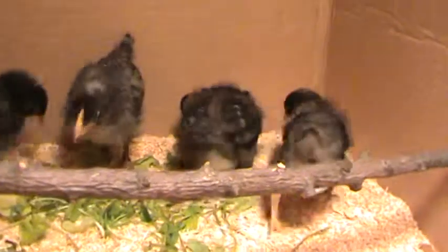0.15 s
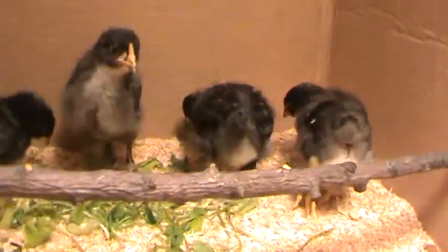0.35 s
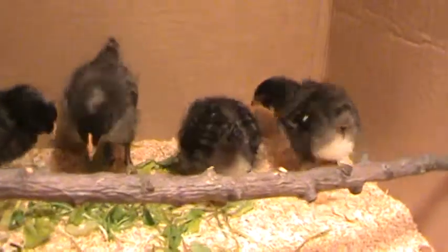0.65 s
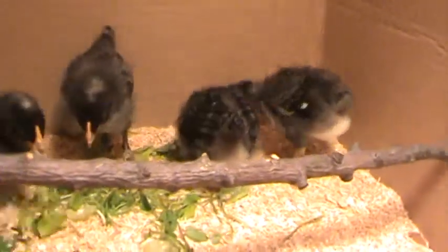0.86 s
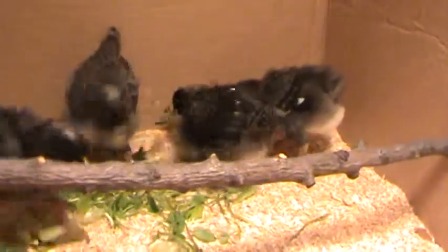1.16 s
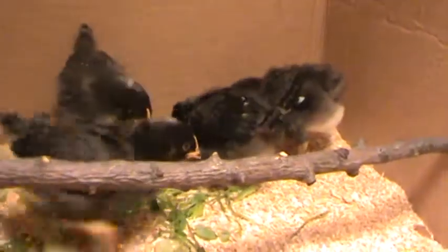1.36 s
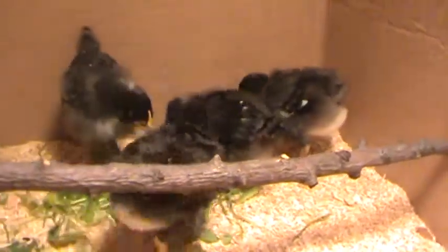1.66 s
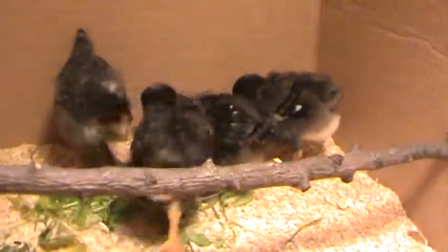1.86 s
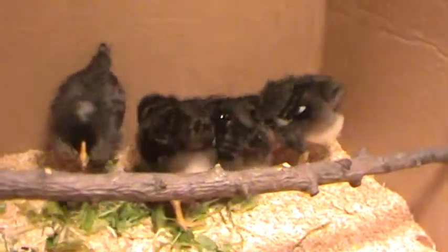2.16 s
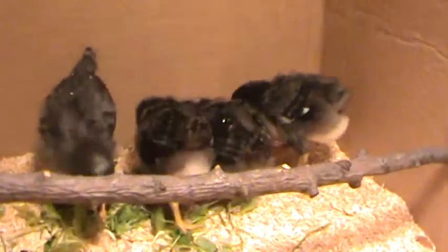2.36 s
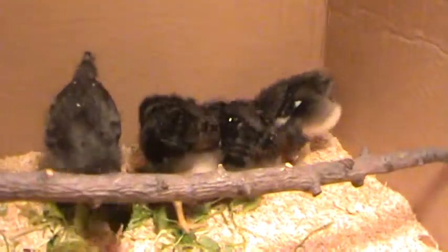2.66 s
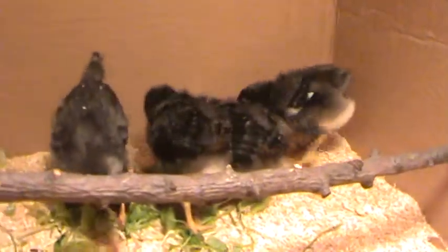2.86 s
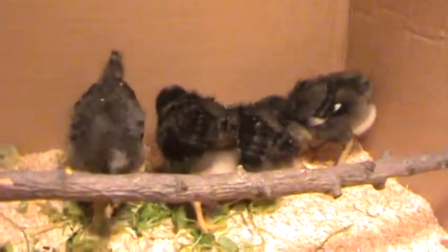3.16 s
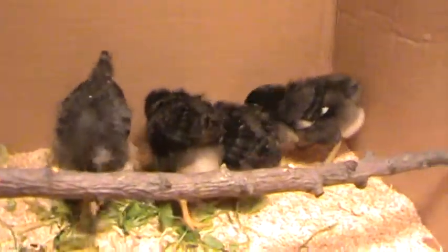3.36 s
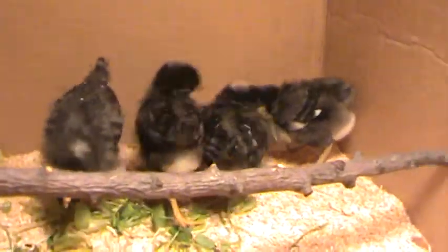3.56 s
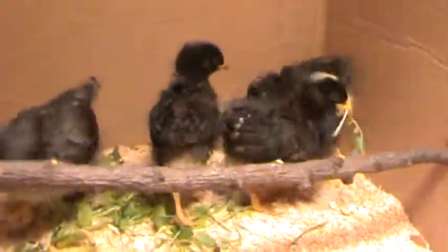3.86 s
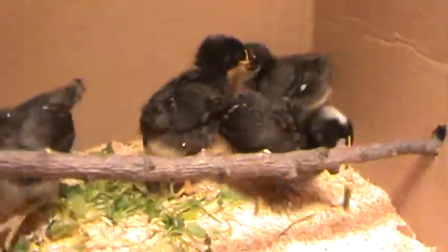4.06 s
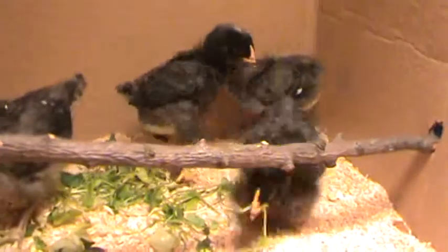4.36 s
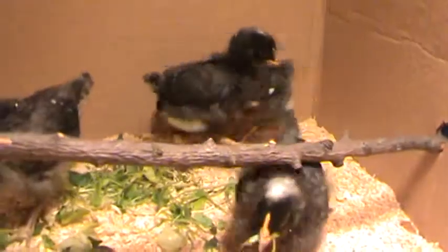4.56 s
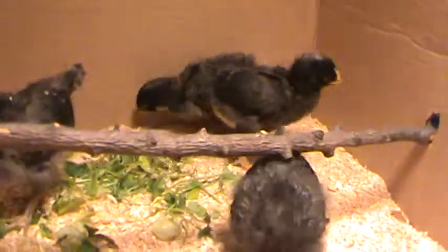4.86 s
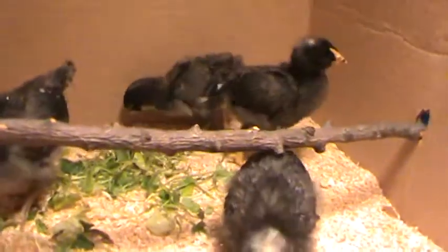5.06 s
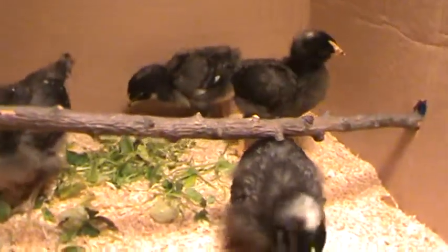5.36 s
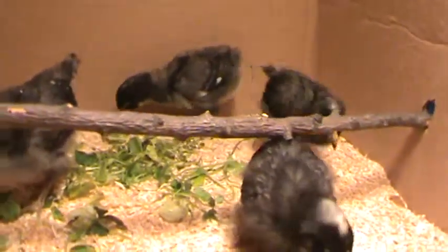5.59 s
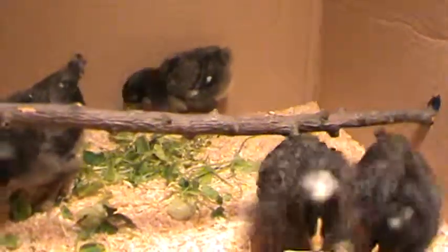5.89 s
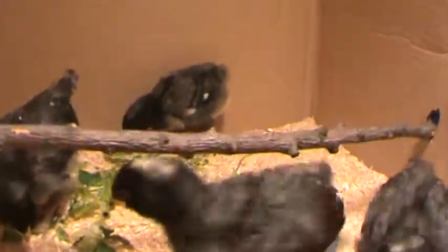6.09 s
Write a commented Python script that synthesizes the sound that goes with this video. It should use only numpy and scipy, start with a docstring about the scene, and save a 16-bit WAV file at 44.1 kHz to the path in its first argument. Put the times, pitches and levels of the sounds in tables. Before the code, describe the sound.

Close stereo sound inside a cardboard brooder box, with very short reflections, faint hiss and a low room rumble. Dry shavings rustle softly from the start; a sharp tick and dull knock come near 0.15 s. From 0.4 to 0.85 s several chicks peep rapidly, thin high crests dropping into louder falling whistles, mixed with lower arched notes. Ticks and light knocks follow at 1.0-1.3 s, then a small group of peeps around 1.4-1.55 s. Clacks at 2.1, 2.7 and 3.2 s surround sparser calls at 2.25-2.45 and 3.15 s. Peeps grow stronger from 3.4 to 4.2 s while treading rumbles the floor from 3.75 s. More calls and a soft chirrup come at 4.6-4.9 s, with a knock and more steps until about 5.45 s, when another chirrup sounds. Loud peeps, crisp raking scratches and swelling rustle finish from 5.7 to 6.2 s.

```python
"""Young chicks in a cardboard brooder box in a quiet, low-rumbling room, heard through two close microphone ports.
Shavings rustle from the start, a sharp snap and a knock lead in, and a first run of peeps follows within a second:
each holds a thin high crest, then breaks into a loud falling whistle, often beside an arched one, mostly low.
Peeps thin out while clacking knocks ring the damped floor, then return louder, with two soft bowl-shaped chirrups.
Treads rumble the floor in the second half; raking feet set shavings ringing, and the rustle swells at the end."""
import sys
import numpy as np
from scipy import signal
from scipy.fft import rfft, irfft, next_fast_len
from scipy.io import wavfile
from scipy.ndimage import uniform_filter1d

SR = 44100
rng = np.random.default_rng(int(sys.argv[2]) if len(sys.argv) > 2 else 0)


def inscribe(sig):
    """Save sig as 16-bit PCM at rate SR to the path in sys.argv[1].

    A 1-D sig is mono; a 2-D sig holds one channel per row.
    Samples are clipped to [-1, 1] before scaling.
    """
    pcm = np.round(np.clip(np.atleast_2d(sig).T, -1, 1) * 32767)
    wavfile.write(sys.argv[1], SR, pcm.astype(np.int16))


N = 274743
TIME = np.arange(N) / SR

# modes of the box floor: (frequency [Hz], relative level [dB])
BOX_MODES = [(172, -5.5), (238, -1), (385, -5.5), (520, 1), (825, 3.5), (1400, -11.5), (1800, -2)]
# spectrum of sharp snaps and ringing shavings: (frequency [Hz], relative level [dB])
SNAP_COLOUR = [(80, -17), (500, -9.5), (2000, -13.5), (5500, -11), (7600, -3), (9000, -3.5), (12500, -18)]
# spectrum of feathers and feet brushing: (frequency [Hz], relative level [dB])
BRUSH_COLOUR = [(30, -6), (130, -1.5), (350, -4), (750, 0), (2200, -4.5), (6300, -9.5), (8600, -4),
                (12000, -20.5)]
SHAVING_LOW_HZ, SHAVING_HIGH_HZ = 3700, 10530   # long and short shavings
SHAVING_CYCLES = 4.2   # cycles until a shaving has died by 60 dB


def from_db(db):
    """Decibels to gain."""
    return 10 ** (np.asarray(db) / 20)


def rms_one(x):
    """Scale to unit rms."""
    return x / np.sqrt(np.mean(x ** 2) + 1e-20)


def at_hz(points, hz):
    """Read a table on a log-frequency axis."""
    known_hz, values = np.transpose(points)
    return np.interp(np.log(np.maximum(hz, 1)), np.log(known_hz), values)


def colour(x, spectrum):
    """Causal (minimum-phase) filter with the given spectrum, made by folding the cepstrum."""
    size = 2 * next_fast_len(x.shape[-1])
    gain = from_db(at_hz(spectrum, np.fft.rfftfreq(size, 1 / SR)))
    cepstrum = irfft(np.log(gain))
    cepstrum[1:size // 2] *= 2
    cepstrum[size // 2 + 1:] = 0
    response = np.exp(rfft(cepstrum))
    return irfft(rfft(x, size) * response)[..., :x.shape[-1]]


def add(track, s, sound):
    """Mix a stereo sound in at time s."""
    start = max(round(s * SR), 0)
    track[:, start:start + sound.shape[1]] += sound[:, :max(N - start, 0)]


def drift(size, per_s):
    """Random values of spread 1, per_s of them each second, joined by straight lines."""
    knots = rng.standard_normal(1024)
    return np.interp(np.arange(size) / SR * per_s, np.arange(len(knots)), knots)


def ring(x, hz, t60):
    """One resonant mode that dies by 60 dB in t60 seconds."""
    radius = from_db(-60 / (t60 * SR))
    angle = 2 * np.pi * hz / SR
    return signal.lfilter([1, 0, -1], [1, -2 * radius * np.cos(angle), radius * radius], x + 1e-18)


def chicks():
    """Each whistled note comes from its own spot in the box."""
    # peeps: (time [s], crest length [s], fall length [s], upswing depth [Hz], crest pitch [Hz],
    #   pitch at start of fall [Hz], end pitch [Hz], crest level [dB], fall level [dB], relative overtone level [dB])
    peeps = [ (0.416, 0.027, 0.02, 4, 4640, 3750, 2500, -51, -29, 9.5),
             (0.462, 0.063, 0.034, 4, 5750, 4760, 2570, -42.5, -19.5, -3.5),
             (0.622, 0.067, 0.031, 1909, 5660, 4730, 2580, -42, -20.5, -0.5),
             (0.779, 0.064, 0.032, 2670, 5640, 4800, 2490, -42, -16.5, -5),
             (1.473, 0.067, 0.024, 2201, 5390, 4600, 2660, -36.5, -24.5, 1),
             (2.251, 0.032, 0.03, 207, 4980, 3670, 2630, -48, -29.5, 5),
             (2.304, 0.056, 0.021, 1357, 5430, 4430, 2760, -40.5, -21.5, -3.5),
             (2.434, 0.062, 0.032, 1490, 5580, 4480, 2590, -38, -22.5, -2.5),
             (3.143, 0.061, 0.05, 799, 5620, 4560, 2590, -37, -23, 2),
             (3.405, 0.04, 0.034, -4, 4960, 3900, 2540, -45, -31, 2.5),
             (3.578, 0.042, 0.028, 0, 5070, 3550, 2580, -36, -17, -3.5),
             (3.979, .036, .089, 7, 5480, 4100, 2786, -37.5, -13, -10),
             (4.042, 0.079, 0.027, 492, 5450, 4600, 2560, -40, -26.5, -8),
             (4.165, 0.039, 0.067, 0, 5275, 4600, 2620, -25.5, -15, -8.5),
             (4.701, 0.054, 0.05, 497, 5160, 4250, 2766, -28, -12, -2),
             (5.786, 0.052, 0.03, 395, 5100, 3930, 2470, -36, -23.5, 12),
             (5.923, 0.028, 0.063, -9, 5050, 3960, 2585, -37, -11.5, -0.5),
             (6.085, 0.049, 0.049, 152, 4680, 3880, 2320, -24.5, -11.5, -6)]
    # arched whistles, mostly low, and a brief peep given as high crest and fall:
    #   (time [s], length [s], crest pitch [Hz], end pitch [Hz], level [dB])
    arches = [(0.442, 0.053, 3390, 3184, -25), (0.538, 0.016, 5180, 4600, -34),
              (0.582, 0.026, 3450, 2620, -22), (0.584, 0.053, 3160, 2630, -18.5),
              (0.604, 0.081, 3650, 2630, -32.5), (1.384, 0.048, 3364, 2550, -19.5),
              (1.414, 0.069, 3584, 3360, -27.5), (1.526, 0.052, 3530, 2586, -18.5),
              (2.271, 0.065, 3644, 3100, -26), (2.426, 0.079, 3840, 2970, -29),
              (3.129, 0.088, 3740, 2480, -33), (3.58, 0.064, 6000, 4280, -37),
              (3.999, 0.061, 3495, 2780, -27), (4.696, 0.066, 3550, 2780, -25.5),
              (4.838, 0.091, 3776, 2920, -26.5)]
    # soft bowl-shaped notes: (time [s], length [s], lowest pitch [Hz], level [dB], relative overtone level [dB])
    chirrups = [(4.607, 0.053, 2740, -22.5, -6), (5.427, 0.047, 2920, -24.5, 2.5)]
    out = np.zeros((2, N))
    for call, rows in ((peep, peeps), (arch, arches), (chirrup, chirrups)):
        for s, *shape in rows:
            add(out, s, in_box(call(*shape)))
    return out


def peep(crest_s, fall_s, upswing_hz, crest_hz, break_hz, end_hz, crest_db, fall_db, overtone_db):
    """The pitch flicks up to a thin, sagging crest, then falls, loudest when crossing the throat's resonance."""
    crest_sag, crest_bend = 0.12, 2.8   # share of its pitch that the crest loses, late rather than early
    swell_db = 9   # growth along the crest
    flick_db = 51   # gain of an opening flick, scaled by its squared depth relative to the throat's resonance
    throat_hz, throat_loss_db = 3450, 19.5   # resonance; loss an octave away from it
    straight_hz_per_s, plunge = 28000, 0.338   # a fall of this slope is straight; steeper ones hang on, then plunge

    u, v = progress(crest_s), progress(fall_s)
    under_hz = upswing(u * crest_s, upswing_hz)
    held_hz = crest_hz * (1 - crest_sag * u ** crest_bend) - under_hz
    held_db = crest_db + swell_db * u ** 2 + flick_db * (under_hz / throat_hz) ** 2

    bend = ((break_hz - end_hz) / fall_s / straight_hz_per_s) ** plunge
    falling_hz = break_hz + (end_hz - break_hz) * v ** bend
    falling_db = fall_db - throat_loss_db * np.log2(falling_hz / throat_hz) ** 2
    return whistle(np.r_[held_hz, falling_hz], np.r_[held_db, falling_db], overtone_db)


def arch(length_s, crest_hz, end_hz, db):
    """The whistle lifts a little and droops, loudest in the middle."""
    upswing_hz, bend, edge_db, overtone_db = 331, 2.61, 5.5, -5.5   # edge_db: loss at both ends
    u = progress(length_s)
    hz = crest_hz + (end_hz - crest_hz) * u ** bend - upswing(u * length_s, upswing_hz)
    return whistle(hz, db - edge_db * (2 * u - 1) ** 2, overtone_db)


def chirrup(length_s, lowest_hz, db, overtone_db, opening_db=12):
    """The pitch runs through a shallow bowl; the note brightens as the beak opens."""
    dip_at, dip_curve_hz = 0.421, 2030   # share of the note at its lowest; steepness of the bowl
    u = progress(length_s)
    hz = lowest_hz + dip_curve_hz * (u - dip_at) ** 2
    return whistle(hz, np.full(len(u), db), overtone_db + opening_db * (u - .5))


def progress(length_s):
    """Runs from 0 to 1 over a part of a note, at least 5 ms long."""
    return np.linspace(0, 1, int(max(length_s, .005) * SR))


def upswing(t, depth_hz):
    """How far the pitch still lies under its crest just after the start."""
    flick_s = .011
    return depth_hz * np.exp(-(t / flick_s) ** 2)


def whistle(hz, db, overtone_db, waver=0.012, flutter_db=1.0, third_db=-0.5):
    """A syrinx membrane whistles along its glide; only loud notes have much of a third harmonic."""
    third_from_hz, third_db_per_hz = 3540, 2.7   # the third harmonic fades above this pitch
    edge_s = .004   # fade-out; the fade-in takes twice as long
    t = np.arange(len(hz)) / SR
    pitch = uniform_filter1d(hz, size=260) * (1 + waver * drift(len(t), 492.0))
    phase = 2 * np.pi * np.cumsum(pitch) / SR
    fade = np.clip(np.minimum(t / 2, t[-1] - t) / edge_s, 0, 1)
    gate = np.sin(np.pi / 2 * fade) ** 2
    level = from_db(uniform_filter1d(db, size=130) + flutter_db * drift(len(t), 248.2))

    second = from_db(overtone_db) * overtone(2, pitch, phase)
    third_gain = from_db(third_db - third_db_per_hz * np.maximum(pitch - third_from_hz, 0))
    third = np.sqrt(level) * third_gain * overtone(3, pitch, phase)
    return gate * level * (np.sin(phase) + second + third)


def overtone(number, pitch, phase):
    """One harmonic, shaped by the beak, its level fluctuating at random."""
    # how the open beak passes overtones: (frequency [Hz], gain [dB])
    beak = [(6500, -12), (8200, -9.5), (9500, -21.5), (11200, -23), (12200, -43)]
    patchy_db = 2 * drift(len(pitch), 70)
    return from_db(at_hz(beak, number * pitch) + patchy_db) * np.sin(number * phase)


def knocks(contact_s=0.0036, crunch_db=-21, ring_cycles=10.4, clack_cycles=9,
           scuff_db=-16, scuff_s=0.031, dull_hz=5000):
    """A solid push and a crunch of shavings set the damped floor thudding; each spot clacks at its own pitch."""
    # feet and beaks hitting the floor, levels ahead of the card's filter:
    #   (time [s], low thump level [dB], body level [dB], clack peak [dB], clack pitch [Hz])
    hits = [(.161, -42, -31, -32, 1100), (1.014, -47, -31.5, -39, 1420), (1.261, -33, -25.5, -32, 1410),
            (2.061, -42, -27.5, -19.5, 1900), (2.093, -24, -26.5, -16.5, 2350),
            (2.717, -32, -23.5, -9, 1850), (2.849, -39, -37, -53, 1100), (3.102, -44, -41, -35, 1090),
            (3.216, -48, -37.5, -20, 2400), (3.245, -31.5, -15.5, -24, 1690),
            (4.321, -24, -33.5, -17, 1460), (4.877, -29, -23.5, -22, 1130)]
    out, t = np.zeros((2, N)), TIME[:SR // 5]
    # thin card radiates neither deep bass nor high treble
    card = signal.butter(2, [130, dull_hz], "band", fs=SR, output="sos")
    for s, thump_db, body_db, clack_db, clack_hz in hits:
        scuffs = np.maximum(drift(len(t), 200), 0) ** 2 * np.exp(-t / scuff_s)
        grit = rng.standard_normal(len(t))
        crunch = grit * np.exp(-t / contact_s)
        rough = crunch + from_db(scuff_db) * scuffs * grit
        push = ((t == 0) + from_db(crunch_db) * rough) / 2   # one-sample impulse plus the crunch
        clack = ring(crunch, clack_hz, clack_cycles / clack_hz)
        knock = from_db(clack_db) * clack / np.abs(clack).max()
        for k, (hz, mode_db) in enumerate(BOX_MODES):
            db = mode_db + (thump_db if hz < 300 else body_db)
            sign = (-1) ** min(k, 3)   # the lowest modes alternate in polarity
            knock = knock + sign * from_db(db) * ring(push, hz, ring_cycles / hz)
        add(out, s, in_box(signal.sosfilt(card, knock)))
    return out


def ticks(fade_s=.01, tick_db=7.0):
    """A faint noise swells just before each sharp snap, which rings at a pitch of its own, then fades."""
    # sharp snaps, one marking the abrupt onset of a peep's fall:
    #   (time [s], peak level before the shared gain tick_db [dB])
    snaps = [(.1523, -27.5), (.487, -26), (.508, -28), (1.041, -21), (1.0462, -25), (1.076, -14),
             (1.261, -21), (1.2928, -14), (1.6363, -21), (1.9168, -26), (2.0938, -20.5), (2.7166, -20),
             (3.2167, -19), (3.263, -14), (4.877, -14.5), (5.0065, -20), (5.9515, -20.5)]
    out, t = np.zeros((2, N)), TIME[:SR // 10] - fade_s   # the snap falls at t = 0
    for s, db in snaps:
        burst = (t >= 0) * np.exp(-np.abs(t) / .0012)
        faint = .18 * np.exp(np.minimum(t / .0025, -t / fade_s))   # swells before the snap, fades after it
        snap = colour((burst + faint) * rng.standard_normal(len(t)), SNAP_COLOUR)
        hz = SHAVING_HIGH_HZ * rng.uniform(.7, 1)
        snap = rms_one(snap) + .5 * rms_one(ring(snap, hz, SHAVING_CYCLES / hz))
        add(out, s + t[0], in_box(from_db(db + tick_db) * snap / np.abs(snap).max()))
    return out


def scrapes(grains_per_s=2600, edge_s=0.0053, drag_db=-3.0, box_share=0.14):
    """A raking foot sets off a dense burst of shavings and drags on the cardboard beneath."""
    # feet raking through the shavings: (time [s], length [s], level [dB])
    rakes = [(0.437, 0.01, -36.5), (2.698, 0.025, -34.5), (4.572, 0.013, -34), (5.707, 0.015, -33.5),
             (5.874, 0.022, -31.5), (6.024, 0.014, -34.5), (6.200, 0.013, -27)]
    out, t = np.zeros((2, N)), TIME[:SR // 10]
    for s, length_s, db in rakes:
        stroke = np.minimum(2 * t / edge_s, 1) * np.exp(-np.maximum(t - length_s, 0) / edge_s)
        rubbing = rng.standard_normal(len(t))
        crisp = shavings((rng.random(len(t)) < grains_per_s / SR) * rubbing)
        drag = rms_one(colour(rubbing, BRUSH_COLOUR)) + box_share * cardboard(rubbing)
        add(out, s, in_box(from_db(db) * stroke * (crisp + from_db(drag_db) * drag)))
    return out


def shavings(flicks, count=14):
    """Every flick sets one shaving ringing, at a pitch that depends on its size."""
    dealt = rng.integers(0, count, len(flicks))
    pitches = np.geomspace(SHAVING_LOW_HZ, SHAVING_HIGH_HZ, count)
    ringing = sum(ring(flicks * (dealt == k), hz, SHAVING_CYCLES / hz) for k, hz in enumerate(pitches))
    return rms_one(colour(ringing, SNAP_COLOUR))


def cardboard(rubbing, wander_db=3):
    """The rubbed floor rings; its higher modes come and go as the contact moves."""
    out = 0
    for hz, db in BOX_MODES[2:]:
        wandering = from_db(db + wander_db * drift(rubbing.shape[-1], 23))
        out = out + wandering * rms_one(ring(rubbing, hz, 20 / hz))
    return out


def litter(box_share=0.069, brush_db=4.5, crackle_db=0.5):
    """Feathers brush along the cardboard; shavings crackle in clumps of tiny grains with a few larger ones."""
    # movement in the litter, joined by straight lines in dB: (time [s], level [dB])
    shuffle = [(0.0, -50.5), (1.5, -51.5), (1.77, -56.5), (3.08, -58), (3.55, -53.5), (3.85, -46.5),
               (4.52, -50.5), (5.44, -48.5), (5.51, -50), (6.23, -43)]
    movement = from_db(np.interp(TIME, *np.transpose(shuffle)))
    rubbing = spread_noise()
    brush = rms_one(colour(rubbing, BRUSH_COLOUR)) + box_share * cardboard(rubbing)

    clumps_db = 4 * np.clip(drift(N, 40), -2, 2)
    sizes = from_db(5.5 * np.minimum(rng.exponential(1, N), 4.5) + clumps_db)
    grains = (rng.random(N) < 700 / SR) * sizes * rng.choice([-1, 1], N)   # about 700 a second
    crackle = in_box(shavings(grains))[:, :N]

    strokes_db = 2 * drift(N, 25) + 1.5 * drift(N, 120)
    return movement * (brush * from_db(brush_db + strokes_db) + crackle * from_db(crackle_db))


def treads(lumpy_db=3.5, brush_spread_db=3.5):
    """While chicks walk, the cardboard floor flexes and rumbles unevenly and their bodies brush the litter."""
    # walking on the box floor: (time [s], length [s], level [dB])
    walks = [(3.744, 0.39, -44.5), (4.85, 0.46, -47.5), (5.117, 0.35, -46)]
    # spectrum of the flexing floor: (frequency [Hz], relative level [dB])
    flex_colour = [(30, -23), (70, -6), (140, -2), (260, -8.5), (600, -43)]
    attack_s, release_s, brush_db = 0.02, 0.14, 4.5
    weight = np.zeros(N)
    for s, length_s, db in walks:
        fade = np.minimum((TIME - s) / attack_s, (s + length_s - TIME) / release_s)
        weight += from_db(db) * np.clip(fade, 0, 1)
    flex = rms_one(colour(rng.standard_normal(N), flex_colour))
    brush_gain = from_db(brush_db + brush_spread_db * rng.standard_normal())   # one chance level for all treads
    brush = brush_gain * rms_one(colour(spread_noise(), BRUSH_COLOUR))
    return weight * from_db(lumpy_db * drift(N, 22.5)) * (flex + brush)


def spread_noise(apart=0.41):
    """White noise from a wide source: mostly alike at the two microphone ports."""
    return rng.standard_normal(N) + apart * rng.standard_normal((2, N))


def reflections(t60, wet_db, apart):
    """Direct sound followed by dense dying echoes, partly different at the two ports."""
    t = TIME[:int(t60 * SR)]
    noise = rng.standard_normal((3, len(t))) * from_db(-60 * t / t60)
    response = noise[0] + apart * noise[1:]
    response *= from_db(wet_db) / np.sqrt(np.sum(response ** 2) / 2)
    response[:, 0] = 1
    return response


def in_box(sound):
    """The close walls echo differently for every spot, so a gliding whistle beats with itself."""
    return signal.fftconvolve(sound[None], reflections(t60=0.066, wet_db=-4.5, apart=0.54), axes=1)


def scene(rumble_db=-54.0):
    """The box stands in a quiet room with a low rumble."""
    # background of the house: (frequency [Hz], relative level [dB])
    rumble_colour = [(25, -32), (80, -6.5), (240, -6.5), (600, -37.5)]
    brooder = chicks() + knocks() + ticks() + litter() + scrapes() + treads()
    room = reflections(t60=0.26, wet_db=-16.5, apart=0.41)
    in_room = signal.fftconvolve(brooder, room, axes=1)[:, :N]
    rumble = rms_one(colour(rng.standard_normal(N), rumble_colour))
    return in_room + from_db(rumble_db) * rumble


def record(dry, width=1.21, port_hz=220, hiss_db=-58.0, cutoff_hz=16000):
    """Two close microphone ports hear the same bass; a little hiss and a steep top cut."""
    mid = dry.mean(axis=0)
    no_bass = signal.butter(2, port_hz, "high", fs=SR, output="sos")
    side = width * signal.sosfilt(no_bass, dry - mid)
    noisy = mid + side + from_db(hiss_db) * rng.standard_normal((2, N))
    top_cut = signal.ellip(10, .1, 80, cutoff_hz, fs=SR, output="sos")
    return signal.sosfilt(top_cut, noisy)


dry = scene()
out = record(dry)
inscribe(out)
```